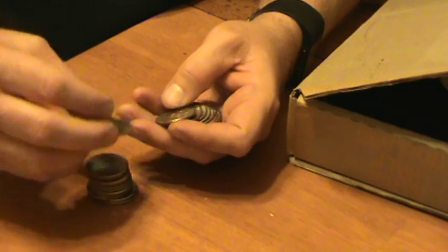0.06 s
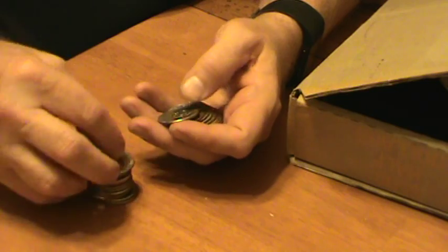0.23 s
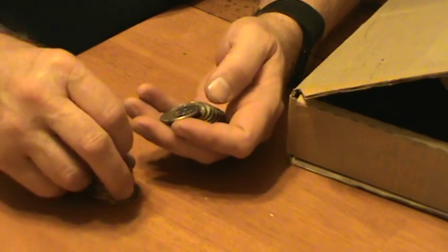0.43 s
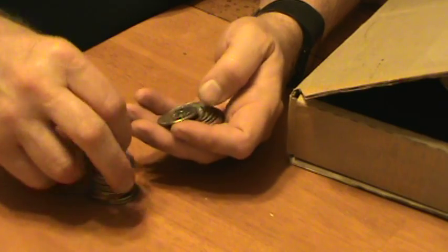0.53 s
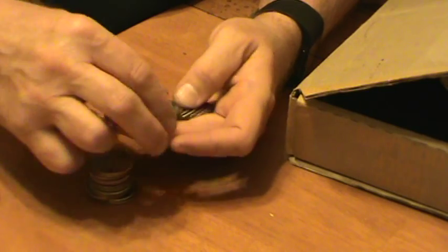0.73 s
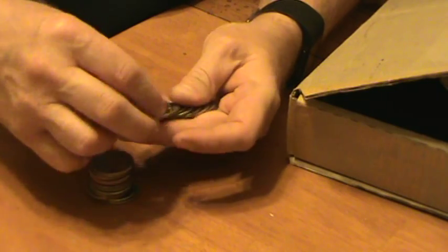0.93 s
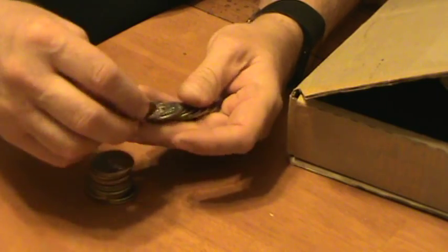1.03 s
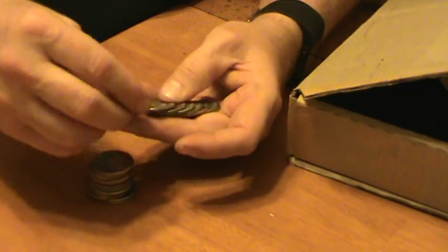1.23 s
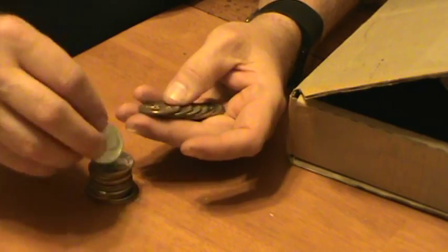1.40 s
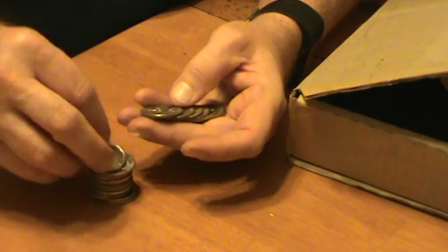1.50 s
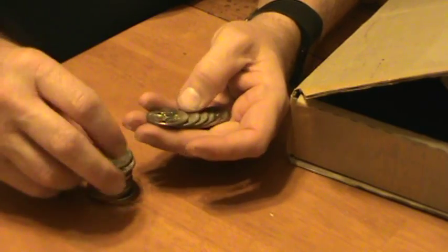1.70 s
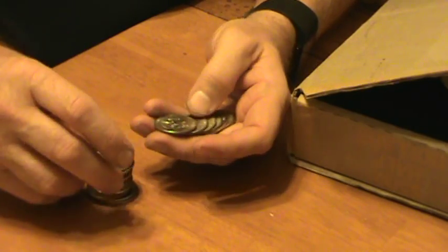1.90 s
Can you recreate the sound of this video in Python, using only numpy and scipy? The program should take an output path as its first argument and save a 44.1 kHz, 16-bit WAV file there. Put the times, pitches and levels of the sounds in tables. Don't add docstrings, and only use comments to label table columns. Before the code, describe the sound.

Coins clink onto a small stack with dull wooden knocks, then lighter clicks and scrapes as more are picked from the palm, then another burst at the stack; close stereo microphone, quiet slightly reverberant room.

```python
import sys
import numpy as np
from scipy import signal
from scipy.fft import rfft, irfft
from scipy.io import wavfile

SR = 44100
rng = np.random.default_rng(int(sys.argv[2]) if len(sys.argv) > 2 else 0)


def unload_audio(sound):
    columns = np.transpose(np.atleast_2d(sound))
    steps = np.round(np.clip(columns, -1, 1) * 32767)
    wavfile.write(sys.argv[1], SR, steps.astype(np.int16))


def boost_factor(decibels):
    exponent = np.asarray(decibels, float) / 20
    return 10 ** exponent


N = 85995


def at_hz(points, hz):
    points_hz, values = np.transpose(points)
    return np.interp(np.log(hz), np.log(points_hz), values)


def rms_one(x):
    return x / np.sqrt(np.mean(x ** 2) + 1e-20)


def modes(hz, gain, t60, length):
    t = np.arange(int(length * SR))[:, None] / SR
    swell = 1 - np.exp(-t * hz / 3)
    decay = boost_factor(-60 * t / t60)
    return np.sum(gain * swell * decay * np.sin(2 * np.pi * hz * t), axis=1)


def add(out, s, sound):
    i = int(s * SR)
    out[..., i:i + sound.shape[-1]] += sound[..., :N - i]


def filtered(x, order, hz, kind):
    return signal.sosfilt(signal.butter(order, hz, kind, fs=SR, output="sos"), x)


def background():
    # (frequency [Hz], level per Hz [dB])
    air_db = [(25, -10), (50, -2.5), (90, -15.5), (140, 3), (212, -7), (500, -11), (1400, -14.5),
              (4000, -25), (16000, -25.5)]
    # (frequency [Hz], level [dB])
    air_side_db = [(40, -21), (150, -14.5), (600, -2), (3000, -3.5)]
    # (frequency [Hz], level [dB], width [Hz])
    hum = [
        (62, -67, 4.0),
        (119, -58, 9.0),
        (15735, -80, 3.0),
    ]
    hz = np.maximum(np.arange(N // 2 + 1) * SR / N, 20)
    white = rfft(rng.standard_normal((3, N)))
    mid_side_db = at_hz(air_db, hz) + at_hz(air_side_db, hz) * [[0], [1]]
    air = irfft(white[:2] * boost_factor(mid_side_db), N)
    out = air / np.std(air[0]) * boost_factor(-54)
    for line_hz, db, width in hum:
        line = irfft(white[2] / (1 + ((hz - line_hz) / width) ** 2), N)
        out[0] += boost_factor(db) * rms_one(line)
    return out


def room(x):
    # (frequency [Hz], t60 [s])
    room_t60 = [(200, 0.96), (1000, 0.6), (3500, 0.53), (9000, 0.37), (15000, 0.34)]
    # (frequency [Hz], level [dB])
    room_db = [(200, -6.5), (1000, 5), (3500, 0.5), (9000, -6.5), (15000, -14.5)]
    # (frequency [Hz], level [dB])
    room_side_db = [(250, -15.5), (1000, -9.5), (4000, -8), (12000, -1.5)]
    rise_s = 0.0029
    t = np.arange(int(.6 * SR)) / SR
    edges = 140 * 2 ** np.arange(0, 7.1, .5)
    white = rng.standard_normal((2, 2, len(t)))
    echo = 0
    for k, (low, high) in enumerate(zip(edges, edges[1:])):
        hz = np.sqrt(low * high)
        t60 = at_hz(room_t60, hz)
        band = filtered(white[k % 2], 2, [low, high], "band")
        mid_side_db = at_hz(room_db, hz) + at_hz(room_side_db, hz) * np.array([[0], [1]])
        echo = echo + band * boost_factor(mid_side_db - 60 * t / t60) * np.sqrt(14 / t60 / SR)
    echo = echo * (1 - np.exp(-(t / rise_s) ** 2))
    return signal.fftconvolve(x[None], echo, axes=1)[:, :N]


def table_top():
    # (time [s], level [dB])
    knocks = [(0.205, -22), (0.222, -21.5), (0.249, -24.5), (0.278, -35), (0.294, -21), (0.442, -32),
              (0.457, -29.5), (0.527, -46), (0.606, -39), (0.964, -45), (1.504, -21), (1.525, -24.5),
              (1.556, -23.5), (1.608, -27), (1.632, -24.5), (1.659, -26.5), (1.76, -38), (1.889, -36),
              (1.907, -37.5)]
    # (frequency [Hz], level [dB], t60 [s])
    wood = [(207, 2, .06), (265, 0, .12), (287, 2, .12), (330, -3, .09), (394, 3, .07), (486, -1, .055),
            (640, -3, .045), (752, 2, .065), (850, -2, .055), (932, 2, .055), (1040, 0, .048),
            (1250, -7, .04), (1450, -9, .035), (1720, -13, .03)]
    crack_t60_s, longest_cycles, detune = 0.029, 50, .006
    out = np.zeros(N)
    hz, db, t60 = np.transpose(wood)
    t60 = np.minimum(t60, longest_cycles / hz)
    fade = boost_factor(-60 * np.arange(2000) / SR / crack_t60_s)
    for s, level_db in knocks:
        g = rng.standard_normal(len(wood))
        gain = boost_factor(level_db + db - 9 + 2.5 * g) * np.sign(np.roll(g, 3))
        add(out, s, modes(hz * (1 + detune * g[::-1]), gain, t60, .2))
        crack = filtered(rng.standard_normal(2000) * fade, 2, [180, 2010], "band")
        add(out, s, boost_factor(level_db + 2.8) * crack)
    return out


def coin_modes(u, g):
    # (frequency [Hz], level [dB])
    coin_db = [(1500, -4.5), (2300, -29), (3000, -13.5), (4500, -14), (6400, -9.5), (8500, -3),
               (12000, -0.5), (16100, -16)]
    damped_t60_s, spread_db = .004, 2.5
    hz = 1400 * 11.5 ** ((np.arange(len(g)) + u[0]) / len(g)) ** .6
    gain = boost_factor(at_hz(coin_db, hz) + spread_db * np.clip(g, -1.5, 1.5)) * np.sign(g[::-1])
    return hz, gain, damped_t60_s * (.6 + u[1])


def slides():
    # (time [s], length [s], level [dB])
    strokes = [(0.2, 0.059, -28), (0.283, 0.048, -35), (0.434, 0.033, -54), (.676, 0.043, -34),
               (0.744, 0.071, -45), (.82, 0.049, -57), (0.948, 0.11, -37), (1.066, 0.071, -59),
               (1.166, 0.13, -45), (1.514, 0.11, -40.5), (1.576, 0.025, -34.5), (1.605, 0.082, -45),
               (1.81, .11, -61)]
    grit_per_s, fade_db = 3800, 9.5
    out = np.zeros(N)
    grains = rng.random(N) < grit_per_s / SR
    grit = grains * rng.standard_normal(N) * boost_factor(1.4 * rng.standard_normal(N))
    for s, length, db in strokes:
        along = np.linspace(0, 1, int(length * SR))
        stroke = np.sin(np.pi * along) ** 0.51 * boost_factor(-fade_db * along)
        coin = modes(*coin_modes(rng.random((2, 80)), rng.standard_normal(80) / 2), .012)
        i = int(s * SR)
        grating = np.convolve(grit[i:i + len(stroke)] * stroke, coin)
        add(out, s, boost_factor(db) * rms_one(grating))
    return out


def pinches():
    # (time [s], frequency [Hz], level [dB])
    pinched = [(.4405, 5700, -39), (0.4586, 3230, -22), (.4555, 4940, -28.5), (.5265, 3870, -34),
               (0.5268, 5500, -36), (.605, 3370, -35), (0.941, 5540, -30), (.8748, 6500, -31),
               (0.638, 6720, -28), (.639, 4030, -28.5), (.671, 5060, -16), (0.679, 4240, -26),
               (0.728, 4620, -21), (0.735, 2880, -32.5), (0.765, 4300, -23), (0.762, 2970, -23.5),
               (.786, 4080, -27), (.821, 4000, -21.5), (0.876, 4420, -28.5), (.963, 4150, -26),
               (0.998, 6300, -21), (0.9962, 4630, -28), (1.011, 6520, -29), (1.059, 4970, -40),
               (1.062, 3080, -58), (1.173, 3800, -40), (1.185, 6700, -35), (1.204, 6340, -29),
               (1.203, 3600, -47), (1.223, 4070, -24), (1.223, 6300, -21.5), (1.277, 5830, -23),
               (1.279, 3040, -24.5), (1.506, 6390, -33), (1.543, 3350, -23), (1.554, 6560, -40),
               (1.608, 3070, -40), (1.837, 4630, -32), (1.906, 3320, -30)]
    out = np.zeros(N)
    for s, hz, db in pinched:
        detune, sign = rng.standard_normal((2, 6))
        add(out, s, modes(hz * (1 + .05 * detune), boost_factor(db - 9) * np.sign(sign), .010, .03))
    return out


def loose_coin():
    # (time [s], level [dB], t60 [s], top mode [Hz])
    rings = [(.2045, -26, .03, 12300), (.678, -31, .07, 12370), (.698, -31, .06, 12370),
             (.712, -32, .06, 12370), (.727, -31, .08, 12370), (.765, -39, .06, 12370),
             (1.057, -22, .045, 12300), (1.085, -33, .055, 12300), (1.505, -19, .055, 12300),
             (1.607, -25, .12, 12285), (1.632, -28, .14, 12285), (1.657, -34, .13, 12285)]
    # (ratio to the top mode, level [dB])
    loose = [(1, 6), (1.0055, 0), (1.025, -6), (1.057, -10), (.85, -10), (.737, -8), (.594, -11.5),
             (.247, -25.5)]
    out = np.zeros(N)
    ratio, db = np.transpose(loose)
    for s, level_db, t60, top_hz in rings:
        gain = boost_factor(level_db + db + 1.5 * rng.standard_normal(len(loose)))
        add(out, s, modes(top_hz * ratio, gain, t60, .2))
    return out * boost_factor(-0.7)


def contacts(rows, trim_db, strong_db, lifts):
    strong_width_hz, click_spread_db, chatter_fade_db, first_db = 700, 3.5, 5, 8
    near_side_db = -13.5
    out = np.zeros((2, N))
    for s, db, strong_hz, length in rows:
        u, g = rng.random((3, 56)), rng.standard_normal((3, 56))
        hz, gain, t60 = coin_modes(u, g[0])
        for lift_hz, lift_db, width in [(strong_hz, strong_db, strong_width_hz), *lifts]:
            gain = gain * boost_factor(lift_db * np.exp(-((hz - lift_hz) / width) ** 2))
        when = u[2] - u[2].min()
        click_db = click_spread_db * g[1] - chatter_fade_db * when + first_db * (when == 0)
        clicks = np.zeros(int(length * SR) + 2)
        np.add.at(clicks, (when * length * SR).astype(int), boost_factor(click_db) * np.sign(g[2]))
        mid = np.convolve(clicks, modes(hz, gain, t60, .012))
        side = np.convolve(clicks, modes(hz, gain * g[2], t60, .012)) * boost_factor(near_side_db)
        add(out, s, np.array([mid, side]) * boost_factor(db + trim_db) / np.abs(mid).max())
    return out


def stack_contacts():
    # (time [s], peak level [dB], strongest mode [Hz], chatter length [s])
    stack = [(.204, -7.5, 12200, .007), (.2105, -7.5, 11500, .007), (.217, -16, 10000, .004),
             (.2215, -7.5, 11200, .002), (.2243, -8.5, 11200, .002), (.232, -12, 10800, .003),
             (.2762, -10, 12500, .003), (.2785, -10, 10780, .003), (.2812, -9, 12400, .004),
             (.3225, -22, 9000, .004), (.4401, -24, 11000, .004), (.4545, -24, 10200, .008),
             (.526, -32, 11200, .003), (.588, -45, 7440, .005), (.6045, -32, 8020, .004),
             (1.5042, -8, 12200, .004), (1.508, -8, 11500, .004), (1.5125, -10, 13500, .004),
             (1.530, -22, 11000, .012), (1.555, -25, 6500, .007), (1.5802, -21, 10000, .018),
             (1.6058, -8, 11000, .003), (1.609, -9.5, 9500, .004), (1.614, -13, 10500, .008),
             (1.6235, -16, 12000, .006), (1.630, -10, 8500, .004), (1.634, -11, 11000, .004),
             (1.638, -18, 10000, .007), (1.6465, -19, 9000, .006), (1.656, -16, 9200, .009),
             (1.757, -32, 7140, .012), (1.814, -34, 10300, .008), (1.8362, -29, 9900, .004),
             (1.885, -34, 9960, .003), (1.8888, -24, 9960, .004), (1.905, -31, 8000, .006)]
    return contacts(stack, -1.5, 6, [])


def palm_contacts():
    # (time [s], peak level [dB], strongest mode [Hz], chatter length [s])
    palm = [(.638, -26, 11500, .007), (.6702, -19, 9500, .005), (.6735, -19, 11000, .003),
            (.6768, -14, 9000, .003), (.680, -18, 12400, .005), (.698, -24, 12400, .007),
            (.712, -29, 12400, .005), (.726, -14, 10600, .003), (.7302, -14.5, 10300, .004),
            (.762, -26, 12860, .005), (.7858, -23, 12600, .004), (.8185, -26, 9500, .003),
            (.8212, -17, 9900, .004), (.8745, -27, 9170, .003), (.9402, -31, 11500, .003),
            (.955, -29, 12760, .004), (.9628, -21, 11000, .002), (.979, -23, 9290, .004),
            (.985, -18, 9200, .002), (.9967, -10, 12800, .003), (1.0106, -14, 12300, .002),
            (1.055, -11, 12400, .002), (1.058, -11, 10500, .003), (1.061, -9, 10500, .005),
            (1.079, -26, 12100, .003), (1.138, -31, 10300, .005), (1.1725, -22, 13100, .002),
            (1.1738, -16, 13100, .002), (1.1837, -14, 12700, .003), (1.1935, -5, 10670, .0015),
            (1.197, -17, 13300, .003), (1.203, -14, 13300, .005), (1.223, -16, 9800, .0006),
            (1.2748, -27, 12800, .002), (1.2765, -20, 10300, .004)]
    # (frequency [Hz], lift [dB], width [Hz])
    cup = [(3000, 0.5, 480), (4300, 1.5, 1300)]
    return contacts(palm, -1.26, 10, cup)


def scene():
    near = stack_contacts() + palm_contacts()
    near[0] += slides()
    near = filtered(near, 4, 1760, "high")
    near[0] += filtered(table_top(), 4, 180, "high")
    ringing, pinched = loose_coin(), pinches()
    to_room = near[0] + boost_factor(-7) * ringing + boost_factor(-3) * pinched
    mid, side = near + room(to_room) + background()
    mid = mid + ringing + pinched
    return np.array([mid + side, mid - side])


def roll_off(x):
    return signal.sosfilt(signal.butter(12, 16970, fs=SR, output="sos"), x)


def record(dry):
    mic = signal.sosfilt(signal.cheby2(14, 28, 16050, fs=SR, output="sos"), dry)
    return roll_off(mic)


dry = scene()
out = record(dry)
unload_audio(out)
```